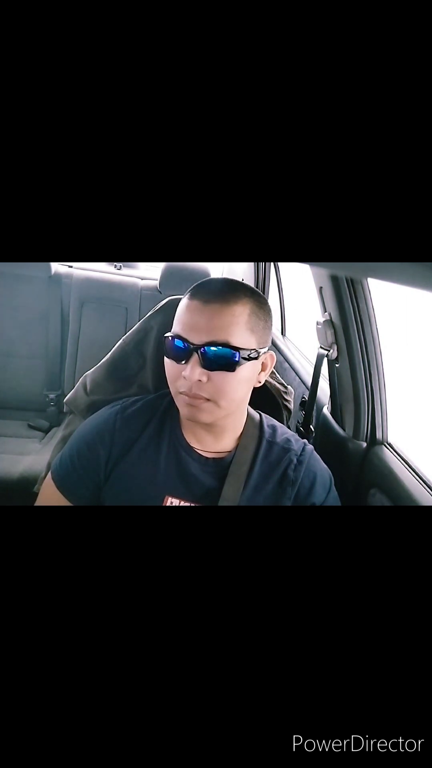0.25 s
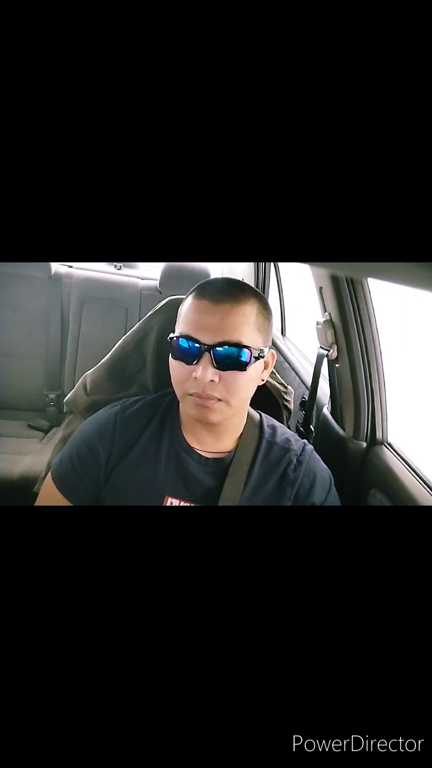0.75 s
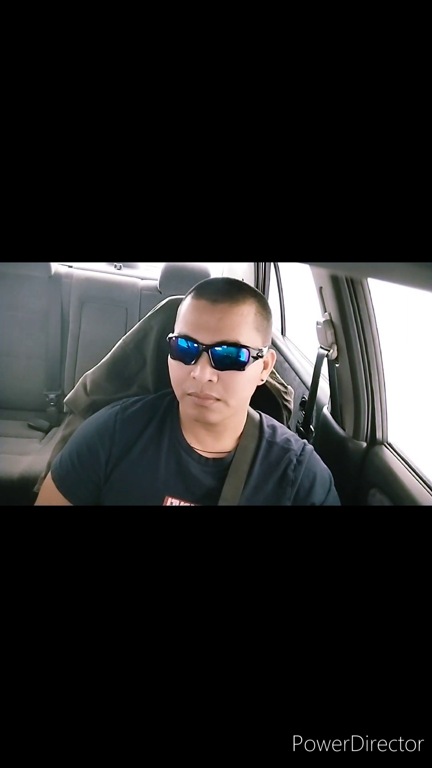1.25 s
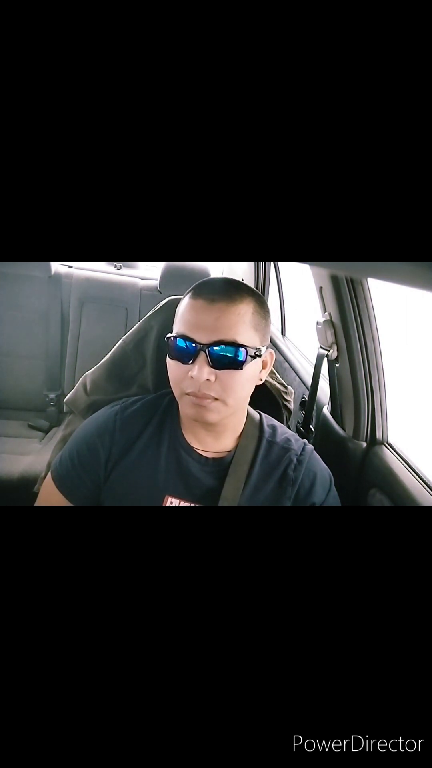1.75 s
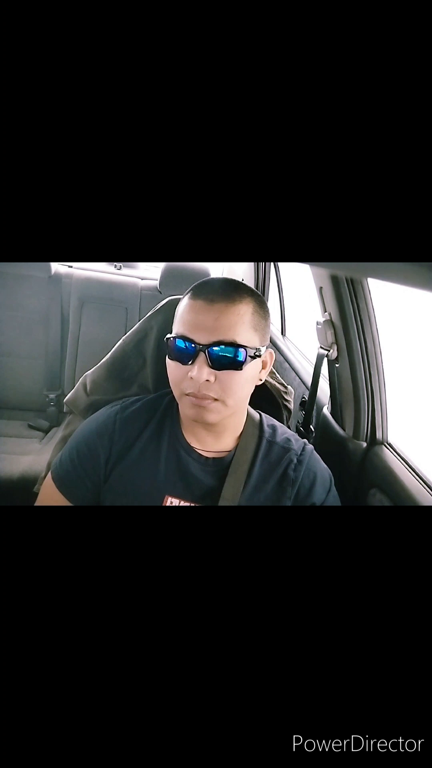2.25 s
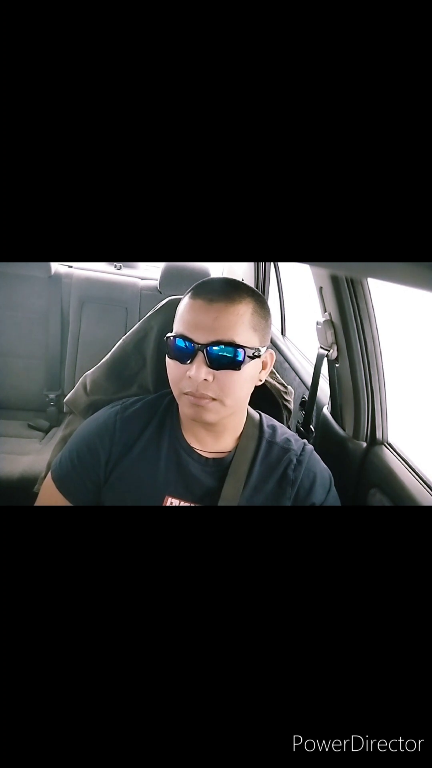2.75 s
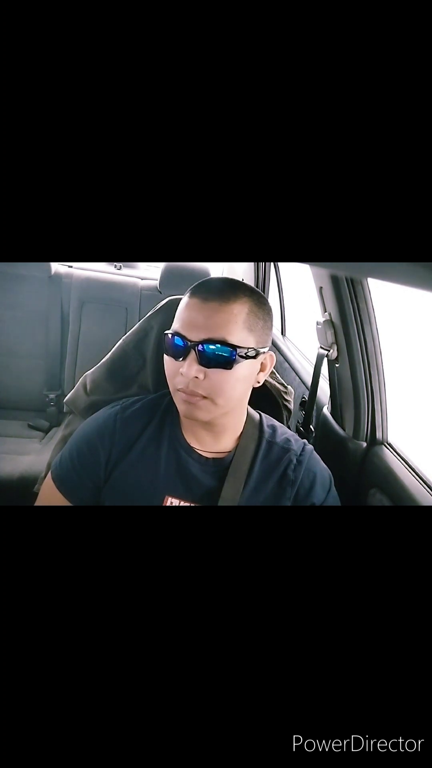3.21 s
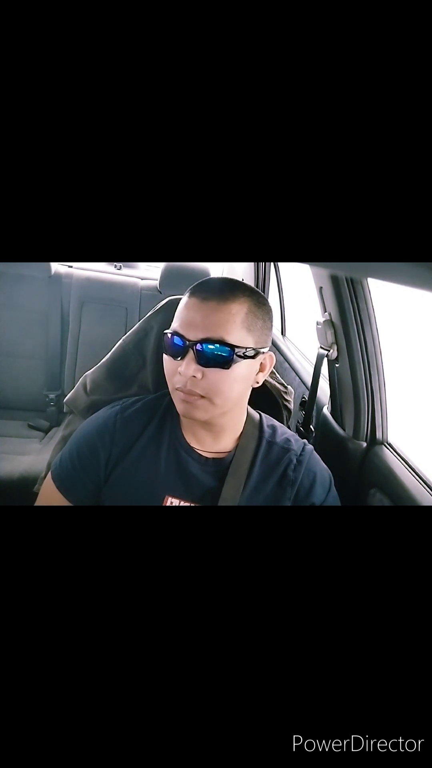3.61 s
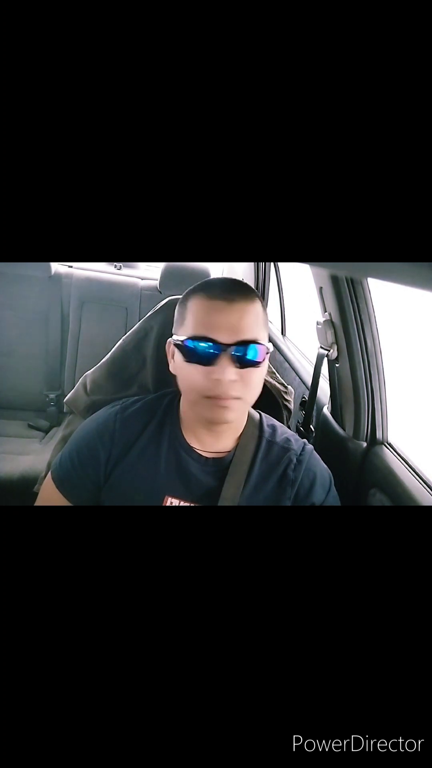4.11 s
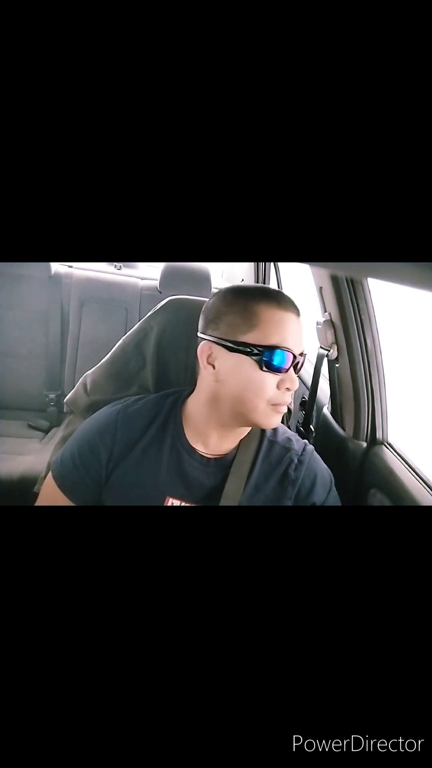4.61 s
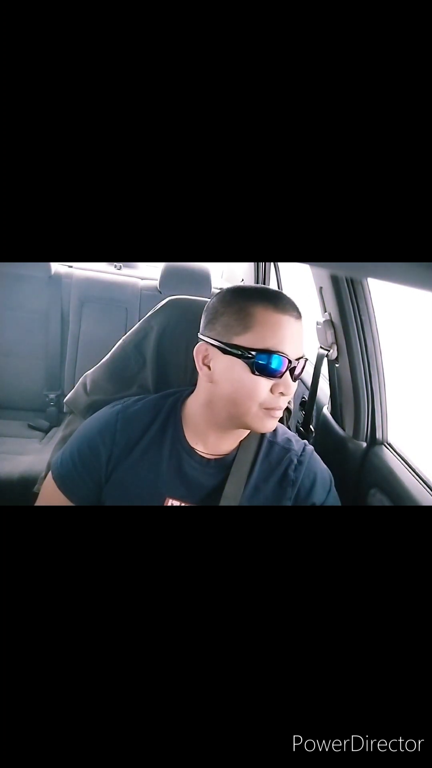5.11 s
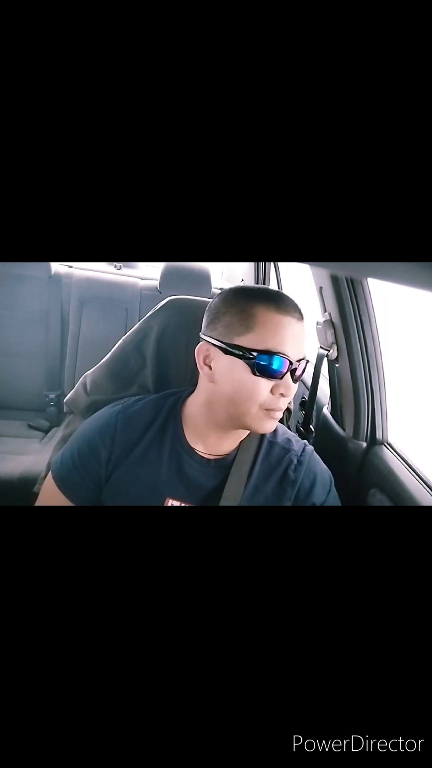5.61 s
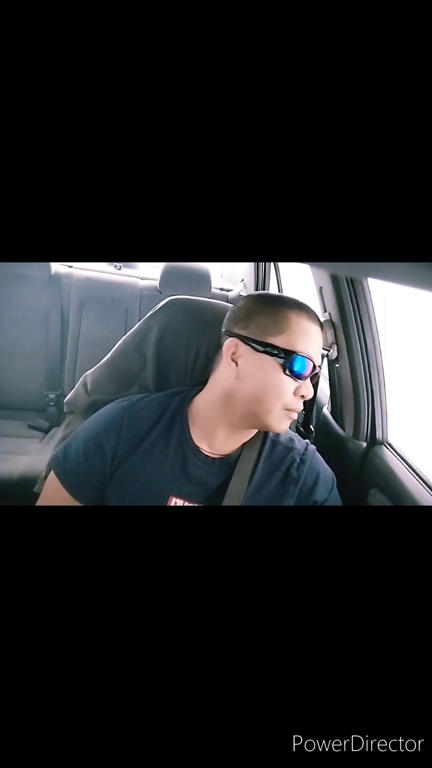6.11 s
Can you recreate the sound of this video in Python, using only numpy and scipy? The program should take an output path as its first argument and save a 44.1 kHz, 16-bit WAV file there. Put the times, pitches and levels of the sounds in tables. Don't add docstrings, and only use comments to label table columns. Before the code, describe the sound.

Small stereo microphones in a car cabin catch dense, irregular water drumming with hollow knocks and boomy thumps, plus a few drop ticks mostly on the right. The jet slides away around 1.6 seconds and the level falls sharply. Muffled motor rumble, pulsing pump hum and constant fine spray remain, broken by a heavy shuddering thud near 4.1 seconds and gentle floor bumps.

```python
import sys
import numpy as np
from scipy import signal
from scipy.fft import rfft, irfft
from scipy.io import wavfile

SR = 44100
rng = np.random.default_rng(int(sys.argv[2]) if len(sys.argv) > 2 else 0)


def ratio(d):
    e = np.asarray(d, float) / 20
    return 10 ** e


def output_pcm(signal):
    pcm = np.clip(np.atleast_2d(signal).T, -1, 1) * 32767
    wavfile.write(sys.argv[1], SR, np.round(pcm).astype(np.int16))


N = 280476
TIME_S = np.arange(N) / SR
HZ = np.fft.rfftfreq(N, 1 / SR) + 1e-3

# mode_hz, width_hz, left_db, right_db
CABIN_MODES = [(53, 32, 3, 0), (144, 52, 3.5, 4.5), (289.5, 32, 6.5, 4), (373, 111, 10, 4.5),
               (398, 58, -7.5, 1), (553.5, 23.4, 9, 6.5), (715, 104, 5, 6.5), (855, 42, 7, 7.5),
               (974, 210, 6.5, 5.5), (1076, 13, 8.5, 1.5), (1200, 210, 3, 4), (1460, 116, 1.5, 4.5),
               (1698, 28, 7.5, 3.5), (2046, 35, -6.5, 6), (2253, 580, 3.5, 5)]
# freq_hz, likeness_0_to_1, phase_lead_rad
JET_LIKENESS = [(40, .98, 0), (80, .85, 0), (150, .9, 0), (300, .72, 0), (470, .58, 0), (560, .85, 0),
                (660, .5, .2), (840, .83, .2), (1060, .4, 2.7), (1500, .4, 5.9), (1730, .78, 7.2),
                (2050, .6, 6.4), (3300, .3, 2.6), (5000, .05, 0)]
# freq_hz, likeness_0_to_1, phase_lead_rad
WASH_LIKENESS = [(40, .98, 0), (150, .92, 0), (400, .75, 0), (870, .2, .5), (960, .45, 2.8),
                 (1350, .58, 2.5), (1700, .3, 1.8), (2100, .43, .2), (2450, .38, .1), (2720, .05, -1.5),
                 (3300, .42, -3.8), (3800, .15, -5.2), (4300, .25, -8.8), (6000, .02, -9)]

# freq_hz, level_db_per_hz
LEFT_PORT = [(700, -19.5), (1300, -9.5), (2200, -12.5), (3500, -12.5), (4300, -18.5), (6000, -29),
             (7000, -35), (8000, -28.5), (9000, -20), (10500, -27.5), (12500, -33), (14800, -40)]
# freq_hz, level_db_per_hz
RIGHT_PORT = [(700, -13.5), (1300, -8), (2200, -12), (2800, -8), (3500, 0), (3820, -4), (4300, -13),
              (6000, -28), (7000, -36.5), (7700, -76), (8200, -82), (9300, -110), (10400, -51),
              (12500, -31.5), (14800, -35.5)]
# time_s, level_db
FLOW = [
    (0, -43.5),
    (1.2, -44),
    (1.7, -46),
    (2.2, -45),
    (3.1, -43.5),
    (4.2, -44.5),
    (5.7, -43.5),
    (6.36, -45),
]
# start_s, left_db, right_db
DROPS = [
    (.4494, -42, -16.5),
    (.6550, -28, -16.5),
    (0.706, -63, -18),
    (.9338, -46, -18),
    (.5492, -39, -40),
    (1.265, -40, -21),
]

# freq_hz, level_db_per_hz
MOTOR_BOOM = [(15, -57), (25, 1), (59, -1.5), (97, 1.5), (140, -3), (177, -4.5), (204, -3), (300, -15.5),
              (390, -41), (660, -120)]
# freq_hz, level_db_per_hz
SHELL_ROAR = [(120, -31), (200, -12), (243, -14), (424, -3), (462, -5), (550, -8), (606, -7), (2000, -29),
              (2600, -47), (4400, -120)]
# start_s, length_s, drone_db
PUMP_SURGES = [(1.86, 0.048, -29.5), (2.142, 0.082, -32), (2.356, 0.1, -34.5), (2.586, 0.08, -33),
               (2.735, 0.072, -27), (2.9, 0.14, -36.5), (3.06, 0.05, -34), (3.143, 0.18, -28.5),
               (3.456, 0.035, -34), (3.711, 0.045, -32), (3.896, 0.11, -32), (4.2, 0.3, -41),
               (4.64, 0.19, -36.5), (5.047, 0.066, -29), (5.167, 0.11, -36), (5.265, 0.12, -40),
               (5.74, 0.18, -41), (5.952, 0.066, -41), (6.098, 0.056, -34)]
# centre_s, half_width_s, depth_db
LULLS = [
    (1.80, 0.027, -2.5),
    (2.535, 0.03, -5.5),
    (3.68, 0.051, 0),
    (4.07, 0.021, -4),
    (4.57, .04, -3),
    (5.66, 0.045, -4),
]
# start_s, peak_db,
# start_hz, end_hz, t60_s
BODY_THUDS = [(0.19, -24, 50.3, 55, .3), (0.51, -19, 48, 51.7, 0.23), (1.05, -6, 54, 62, 0.17),
              (4.133, -13, 43, 60, 0.25), (4.207, -25, 130, 140, 0.51), (4.15, -32, 440, 420, 0.35),
              (4.124, -14, 58, 58, 0.1), (4.226, -15, 182, 188, 0.18), (4.281, -30, 125, 120, 0.15),
              (4.308, -19, 191, 190, 0.2), (4.335, -24, 60, 62, 0.18), (3.6, -20, 87, 88, 0.16),
              (1.03, -19, 270, 270, 0.23), (1.615, -16.5, 200, 250, 0.21), (1.656, -18.5, 370, 390, .15),
              (1.69, -21.5, 185, 200, 0.22), (1.72, -35, 300, 300, 0.13)]
# start_s, peak_db, pitch_hz
CONVEYOR_BUMPS = [(1.99, -33, 75.3), (2.19, -32, 60), (2.98, -33, 101), (3.17, -39, 70), (3.31, -45, 106),
                  (3.45, -30, 100), (3.49, -24, 192.5), (5.03, -20.5, 89.5), (5.37, -25, 76),
                  (5.535, -28, 90), (6.07, -29, 70.6), (6.2, -32, 50), (6.28, -23, 106), (6.32, -24, 190)]

# freq_hz, level_db_per_hz
DRUMMING = [(120, -4.5), (200, -6), (247, -7.5), (365, -2), (552, -5), (610, -9), (845, -8.5), (1110, -15),
            (1450, -15.5), (2220, -26.5), (4000, -38.5), (5200, -91), (8800, -120)]
# freq_hz, level_db_per_hz
PAN_BOOM = [(15, -39), (25, -27), (43, -5), (80, -4), (146, -3), (220, -8), (290, -25), (480, -120)]
# start_s, swell_db
SLAPS = [(.053, -4), (.145, 0), (.203, 10), (0.256, 0), (0.295, 3), (.35, 18), (.405, 17), (0.495, 3),
         (0.519, 24), (.563, -4), (.615, 4), (0.698, 0), (.736, 1), (.787, 4), (0.839, 16), (0.883, 13),
         (.943, 18), (1.003, -4), (1.055, 19), (1.095, -2), (1.164, 14), (1.198, 14), (1.265, 4),
         (1.315, 9), (1.407, -18), (1.466, 2), (1.586, 17), (1.635, 10), (1.689, 18)]
# start_s, peak_db, pitch_hz
DOOR_RINGS = [(0.054, -14.5, 824), (0.141, -22, 785), (0.179, -23, 840), (0.204, -15, 900),
              (0.256, -9.5, 845), (0.31, -26, 860), (0.342, -21, 870), (0.405, -15, 750), (0.451, -13, 840),
              (0.514, -12, 865), (0.562, -13.5, 876), (0.633, -18, 900), (0.701, -17, 855),
              (0.737, -31, 850), (0.788, -29, 850), (0.84, -11, 848), (0.891, -17, 917), (0.942, -23, 840),
              (1.004, -30, 810), (1.049, -23, 870), (1.097, -16, 854), (1.156, -20, 840), (1.199, -14, 754),
              (1.266, -20, 870), (1.323, -25, 762), (1.36, -31, 910), (1.408, -15, 893), (1.468, -23, 849),
              (1.521, -36, 970), (1.632, -20.5, 866)]
# start_s, peak_db, pitch_hz
WINDOW_PINGS = [(0.1241, -27, 1490), (0.1665, -29, 1410), (0.2002, -23, 1680), (0.2453, -29, 1450),
                (0.2932, -18, 1410), (0.3401, -28, 1420), (0.4443, -23, 1610), (0.4848, -37, 1390),
                (0.5187, -25, 1500), (0.5477, -22, 1470), (0.6135, -36, 1340), (0.6389, -23, 1490),
                (0.7387, -25, 1480), (0.825, -20, 1440), (0.9188, -36, 1470), (0.9815, -23, 1480),
                (1.0116, -33, 1490), (1.0475, -20.5, 1420), (1.0894, -38, 1490), (1.1443, -28, 1450),
                (1.1857, -20, 1494), (1.2256, -21, 1420), (1.263, -23, 1530), (1.3069, -20.5, 1450),
                (1.3528, -23, 1450), (1.4122, -21, 1480), (1.4464, -21, 1730), (1.4845, -28, 1463),
                (1.552, -25, 1680), (1.6871, -31, 1760)]
# start_s, peak_db, pitch_hz
ROOF_KNOCKS = [(0.043, -30, 358), (0.145, -12, 390), (0.254, -20, 371), (0.296, -17, 412),
               (0.441, -13, 414), (0.494, -12, 382), (0.533, -9, 373), (0.579, -8, 356), (0.617, -14, 445),
               (0.649, -9.5, 540), (0.692, -10, 393), (0.749, -6, 383), (0.828, -20, 380), (0.875, -9, 547),
               (0.98, -16, 436), (1.019, -14, 417), (1.055, -7, 560), (1.093, -28, 353), (1.225, -13, 327),
               (1.267, -14, 374), (1.311, -17, 553), (1.375, -10, 393), (1.459, -9, 374), (1.499, -18, 520)]
# start_s, peak_db, pitch_hz
PAN_THUMPS = [(0.013, -16, 149), (0.179, -6, 132), (0.316, -7, 158), (0.399, -12, 158), (0.579, -5, 151),
              (0.644, -16, 148), (0.736, -9, 120.5), (0.853, -13, 135), (0.943, -21, 166),
              (1.003, -14, 142), (1.075, -11, 130), (1.197, -2, 142), (1.275, -9, 190), (1.362, -14, 149),
              (1.506, -27, 144), (1.62, -13, 157)]
# start_s, peak_db, pitch_hz
DOOR_SMACKS = [
    (0.053, -12.5, 745),
    (0.494, -13, 530),
    (0.699, -17, 541),
    (0.736, -22, 576),
    (0.787, -19, 856),
    (1.056, -15, 546),
    (1.266, -18, 867),
    (1.38, -18, 576),
    (1.575, -13, 545),
]


def rms_one(x):
    return x / np.sqrt(np.mean(x ** 2) + 1e-20)


def at_hz(points, hz, column=1):
    points = np.array(points)
    return np.interp(np.log(hz), np.log(points[:, 0]), points[:, column])


def balance(left_over_right_db):
    return ratio([[left_over_right_db / 2], [-left_over_right_db / 2]])


def drift(rate_hz):
    pole = np.exp(-80 * np.pi * rate_hz / SR)
    noise = rng.standard_normal(N // 40 + 2002)
    slow = signal.lfilter([1], [1, -2 * pole, pole * pole], noise)[2000:]
    return np.interp(np.arange(N) / 40, np.arange(len(slow)), rms_one(slow))


def churn(colour, likeness, low_hz, count, shared_db, own_db, rate_hz, tilt_db=0, swell_db=0):
    mid, side = rfft(rng.standard_normal((2, N)))
    alike = np.clip(at_hz(likeness, HZ), 0, 1)
    opposed_side = side * np.array([[1], [-1]])
    pair = colour * (np.sqrt(1 + alike) * mid + np.sqrt(1 - alike) * opposed_side)
    pair[1] *= np.exp(1j * at_hz(likeness, HZ, column=2))
    place = np.clip(2 * np.log2(HZ / low_hz), 0, count - 1)
    together_db = shared_db * drift(rate_hz)
    out = 0
    for k in range(count):
        band = irfft(pair * np.clip(1 - abs(place - k), 0, 1), N)
        flicker_db = together_db + own_db * drift(rate_hz)
        lean_db = tilt_db * (k - count // 3) / 2
        lift_db = swell_db * (k / count) ** 0.76
        out = out + band * ratio(flicker_db + lean_db + lift_db)
    return rms_one(out)


def struck(hits, trim_db, attack_s, t60_s):
    out = np.zeros(N + SR)
    t = np.arange(SR // 8) / SR
    shape = (1 - np.exp(-t / attack_s)) ** 2 * ratio(-60 * t / t60_s)
    for start_s, peak_db, hz in hits:
        i = round(start_s * SR)
        out[i:i + len(t)] += ratio(peak_db + trim_db) * shape * np.sin(2 * np.pi * hz * t)
    return out[:N]


def cabin_gain():
    lift_db = 0
    for mode_hz, width_hz, left_db, right_db in CABIN_MODES:
        bell = 1 / (1 + (2 * (HZ - mode_hz) / width_hz) ** 2)
        lift_db = lift_db + np.outer([left_db, right_db], bell)
    return ratio(lift_db)


def water_flow():
    time_s, level_db = np.transpose(FLOW)
    return np.interp(TIME_S, time_s, level_db)


def spray(cabin, flow_db):
    ports = ratio([at_hz(LEFT_PORT, HZ), at_hz(RIGHT_PORT, HZ)]) * (HZ > 500)
    hiss = churn(ports * cabin, WASH_LIKENESS, 990, count=9, shared_db=-0.7, own_db=0.87, rate_hz=32)
    return ratio(flow_db + 7.0) * hiss


def drops():
    port_hz, port_t60_s = [9000, 3450], np.array([[.004], [.008]])
    crack_db, crack_s = -31, .0025
    out = np.zeros((2, N))
    t = np.arange(SR // 50) / SR
    shape = ratio(-60 * t / port_t60_s) * (1 - np.exp(-t / 0.00022))
    rings = np.sin(2 * np.pi * np.outer(port_hz, t)) * shape
    splash = np.diff(rng.standard_normal((2, len(t) + 1))) * np.exp(-t / crack_s)
    rings = rings + ratio(crack_db) * splash
    for start_s, left_db, right_db in DROPS:
        scatter = rng.standard_normal((2, 40)) / 5
        tick = signal.fftconvolve(rings, scatter, axes=1)[:, :len(t)]
        i = round(start_s * SR)
        out[:, i:i + len(t)] += tick * ratio([[left_db], [right_db]])
    return out


def pump_drone():
    pitch_hz, waver_hz, tone_share = 144, 4.0, .55
    idle_db, edge_s = -47.5, 0.1
    mode = 1 / (1 + ((HZ - 144) / 24) ** 2)
    noise = churn(mode, WASH_LIKENESS, 144, count=1, shared_db=3.0, own_db=0.0, rate_hz=10.4)
    phase = 2 * np.pi * np.cumsum(pitch_hz + waver_hz * drift(5.18)) / SR
    tone = np.sqrt(2) * np.sin(phase) * ratio(0.64 * drift(7.9))
    gain = ratio(idle_db)
    for start_s, length_s, drone_db in PUMP_SURGES:
        inside_s = np.minimum(TIME_S - start_s, start_s + length_s - TIME_S)
        gain = gain + ratio(drone_db) * np.clip(inside_s / edge_s + .5, 0, 1)
    return gain * (tone_share * tone + np.sqrt(1 - tone_share ** 2) * noise)


def body_thuds():
    out = np.zeros(N)
    for start_s, peak_db, start_hz, end_hz, t60_s in BODY_THUDS:
        t = np.clip(TIME_S - start_s, 0, None)
        hz = end_hz + (start_hz - end_hz) * np.exp(-t / 0.124)
        shape = (1 - np.exp(-t / 0.014)) * ratio(-60 * t / t60_s)
        phase = 2 * np.pi * np.cumsum(hz * (t > 0)) / SR + np.pi
        out += ratio(peak_db) * shape * np.sin(phase)
    return out


def gantry(cabin, flow_db):
    swing_db = flow_db - flow_db.mean()
    boom_db = -33.5 + 0.32 * swing_db
    roar_db = -36 + 0.43 * swing_db
    since_s = np.clip(TIME_S - BODY_THUDS[3][0], 0, None)
    shaken_db = 7.2 * (1 - np.exp(-since_s / 0.028)) * np.exp(-since_s / 0.14)
    lull_db = 0
    for centre_s, half_width_s, depth_db in LULLS:
        lull_db = lull_db + depth_db * np.exp(-((TIME_S - centre_s) / half_width_s) ** 2)

    boom = churn(ratio(at_hz(MOTOR_BOOM, HZ)) * cabin, WASH_LIKENESS, 32, count=7,
                 shared_db=0.5, own_db=1.76, rate_hz=23.0)
    roar = churn(ratio(at_hz(SHELL_ROAR, HZ)) * cabin, WASH_LIKENESS, 130, count=7,
                 shared_db=.3, own_db=.5, rate_hz=18.0, tilt_db=-.3 * shaken_db)
    rumble = ratio(lull_db) * (ratio(boom_db + 1.4 * shaken_db) * boom + pump_drone())
    roar = ratio(roar_db + .4 * lull_db + 1.5 * shaken_db) * roar
    bumps = struck(CONVEYOR_BUMPS, 3.8, 0.012, .16)
    return (rumble + roar + body_thuds() + bumps) * balance(-1.5)


def sliding_off(level_db, leaves_s, fade_db_per_s):
    return level_db - fade_db_per_s * np.clip(TIME_S - leaves_s, 0, None)


def slap_swell():
    slugs = np.zeros(N)
    for start_s, swell_db in SLAPS:
        slugs[round(start_s * SR)] = swell_db
    t = np.arange(SR // 10) / SR
    return np.convolve(slugs, (1 - np.exp(-t / 0.00086)) * np.exp(-t / 0.016))[:N]


def slug_hits():
    door = struck(DOOR_RINGS, 1.3, 0.0024, 0.052) + struck(DOOR_SMACKS, 2.3, 0.00036, .025)
    window = struck(WINDOW_PINGS, 1.5, 0.0021, 0.043)
    roof = struck(ROOF_KNOCKS, -2.4, 0.0025, 0.064)
    floor_pan = struck(PAN_THUMPS, -2.5, 0.011, 0.15)
    return door + window + roof + floor_pan


def jet(cabin):
    drumming = churn(ratio(at_hz(DRUMMING, HZ)) * cabin, JET_LIKENESS, 217, count=9, shared_db=1.25,
                     own_db=1.5, rate_hz=22, tilt_db=-0.78, swell_db=.6 * slap_swell())
    boom = churn(ratio(at_hz(PAN_BOOM, HZ)) * cabin, JET_LIKENESS, 55, count=5,
                 shared_db=0.4, own_db=-1.1, rate_hz=14.0)
    drumming = ratio(sliding_off(-21.5, 1.564, 75)) * drumming
    boom = ratio(sliding_off(-21.5, 1.45, 64)) * boom
    still_on = np.interp(TIME_S, [1.72, 1.9], [1, 0])
    return (slug_hits() + still_on * (drumming + boom)) * balance(-2)


def scene():
    cabin = cabin_gain()
    flow_db = water_flow()
    return spray(cabin, flow_db) + drops() + gantry(cabin, flow_db) + jet(cabin)


def band_limit(x):
    return signal.sosfilt(signal.butter(12, 15300, fs=SR, output="sos"), x)


def record(dry):
    soft_start = np.clip(TIME_S / 0.0005, 0, 1)
    bass_cut = signal.butter(8, 37, "highpass", fs=SR, output="sos")
    thin = signal.sosfilt(bass_cut, dry * soft_start)
    return band_limit(thin)


dry = scene()
out = record(dry)
output_pcm(out)
```